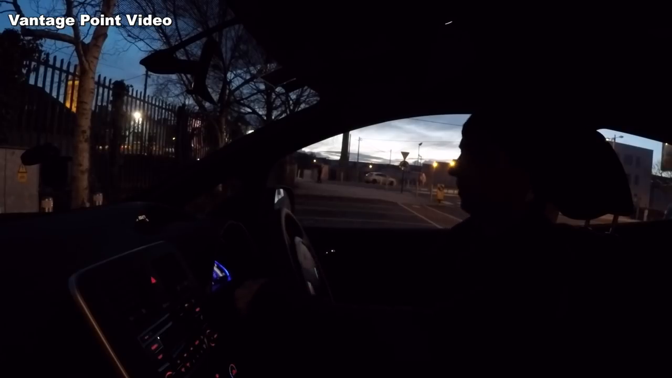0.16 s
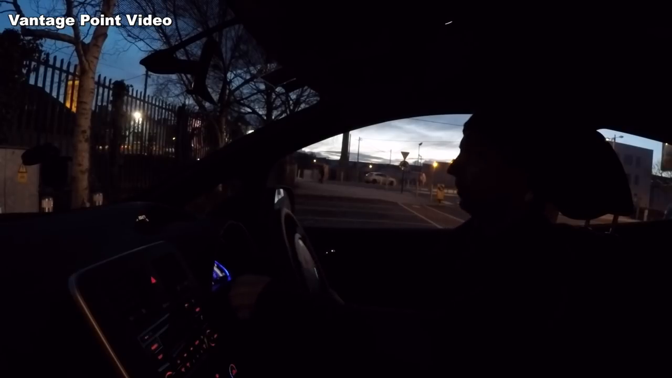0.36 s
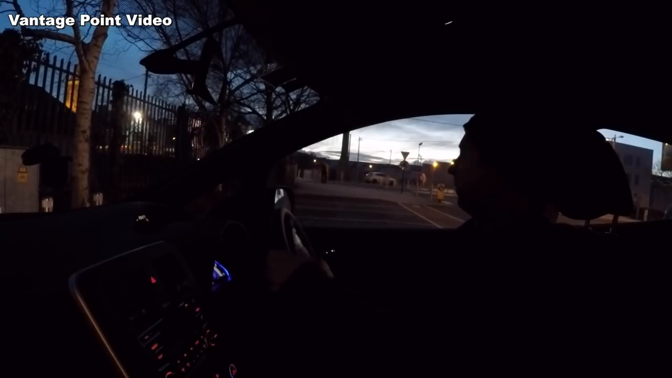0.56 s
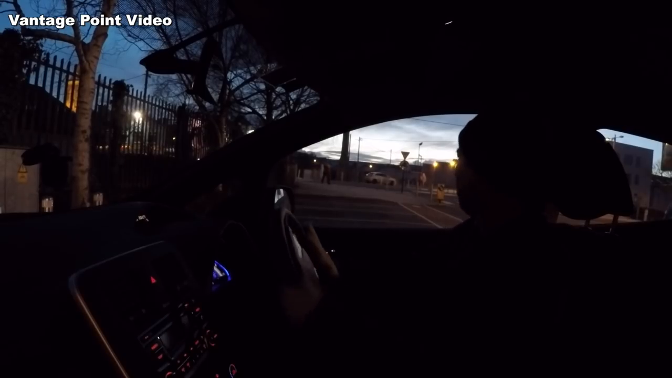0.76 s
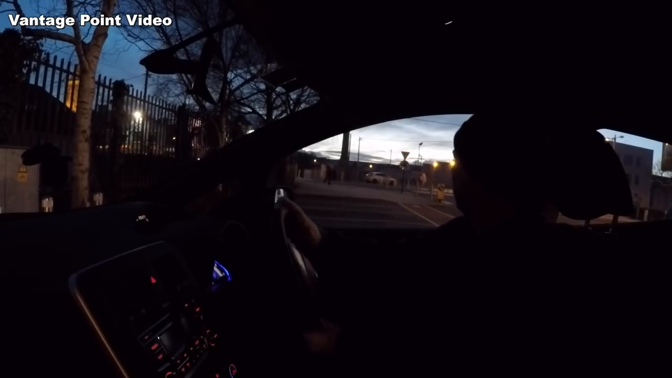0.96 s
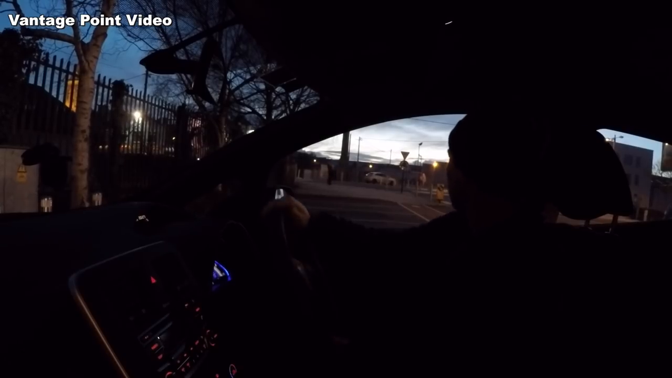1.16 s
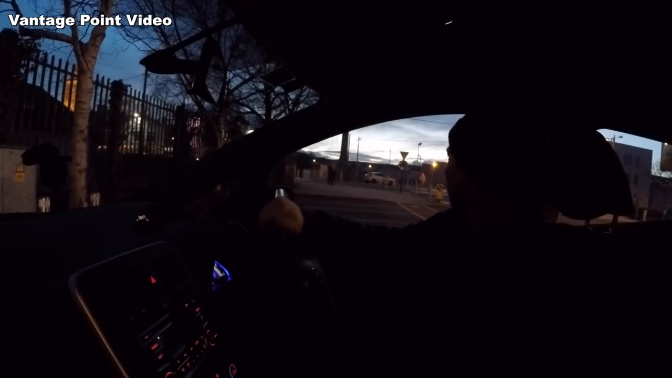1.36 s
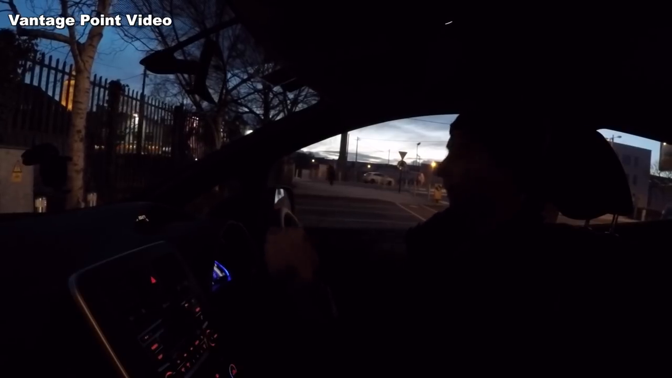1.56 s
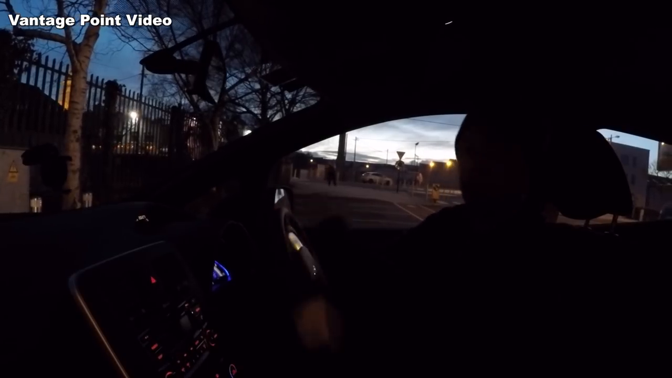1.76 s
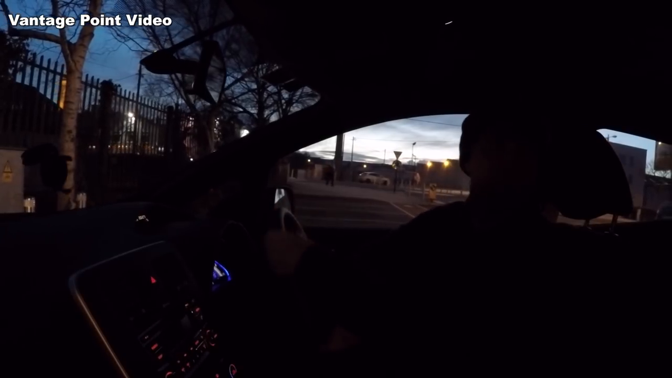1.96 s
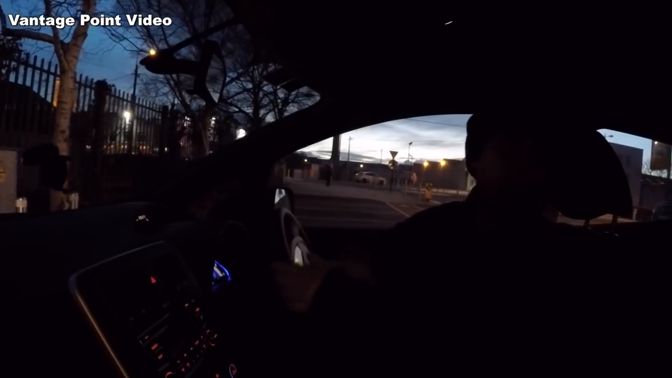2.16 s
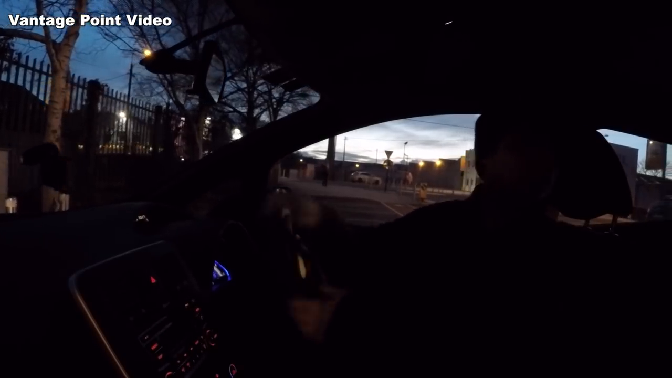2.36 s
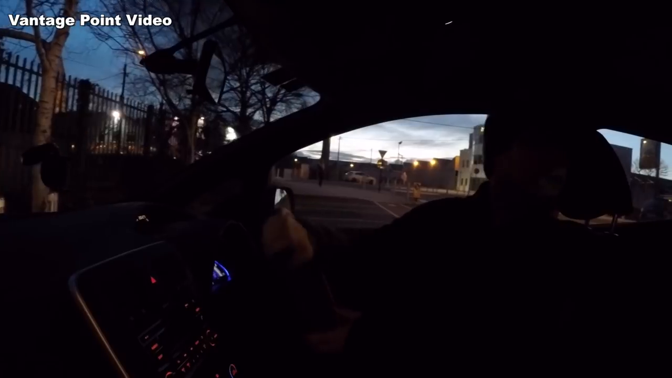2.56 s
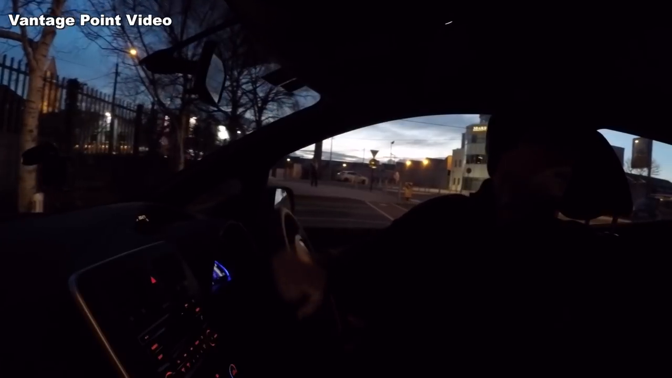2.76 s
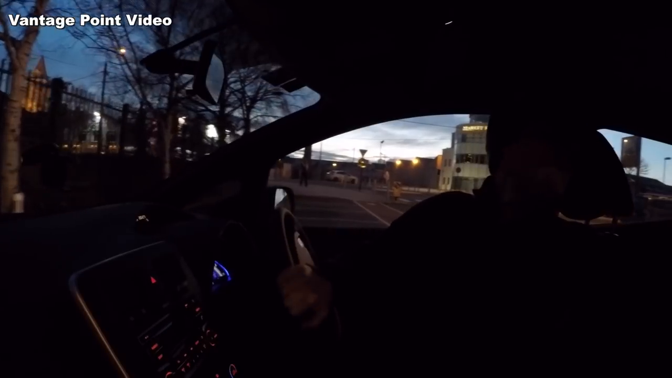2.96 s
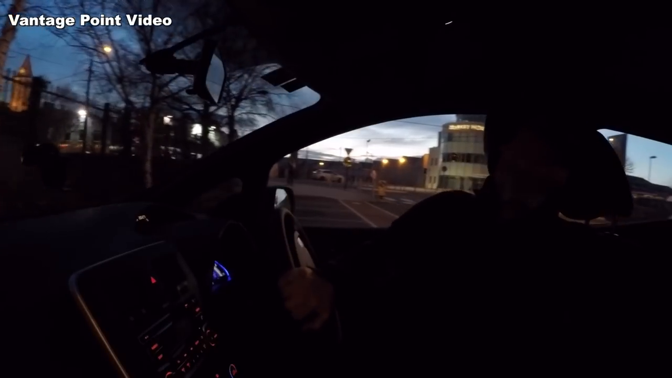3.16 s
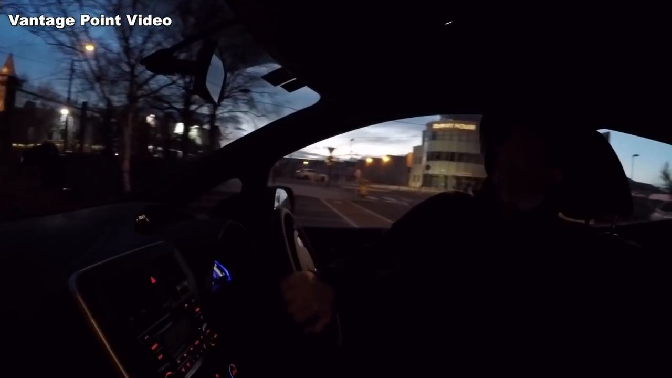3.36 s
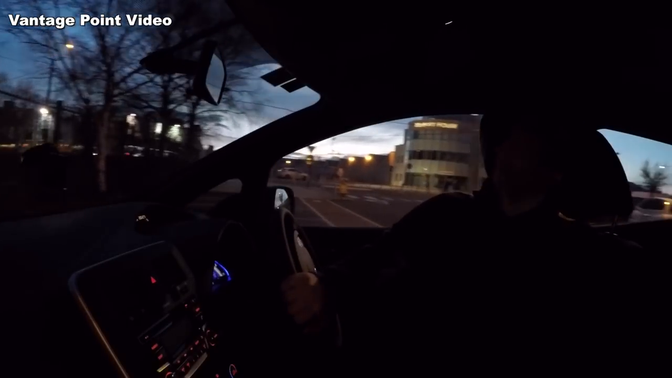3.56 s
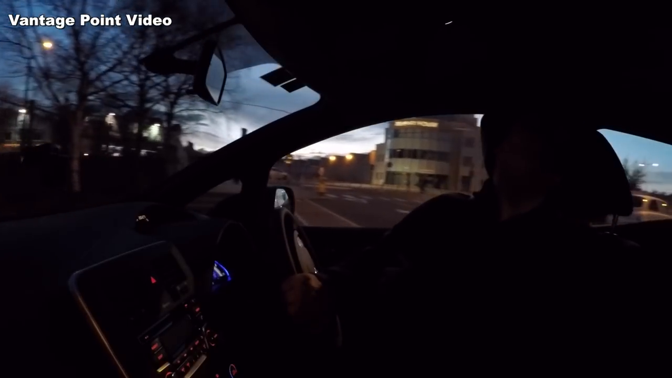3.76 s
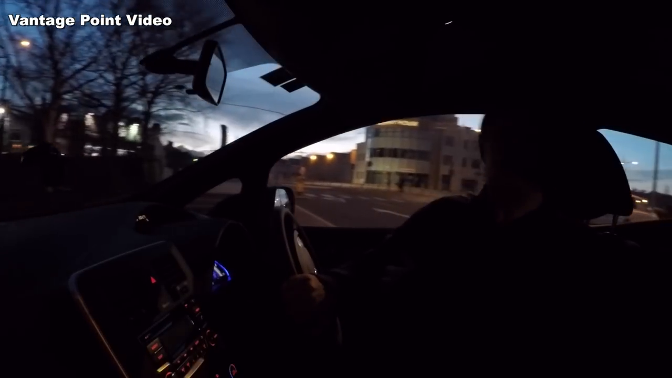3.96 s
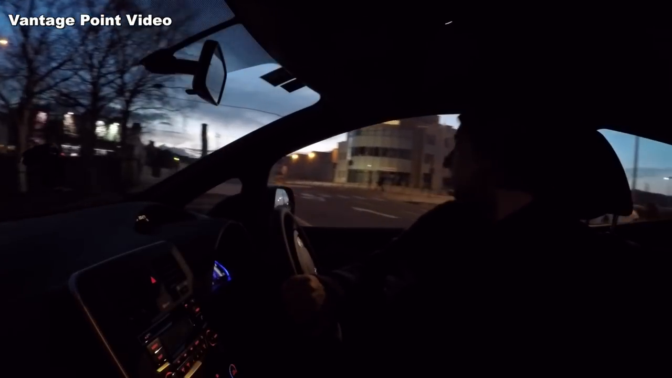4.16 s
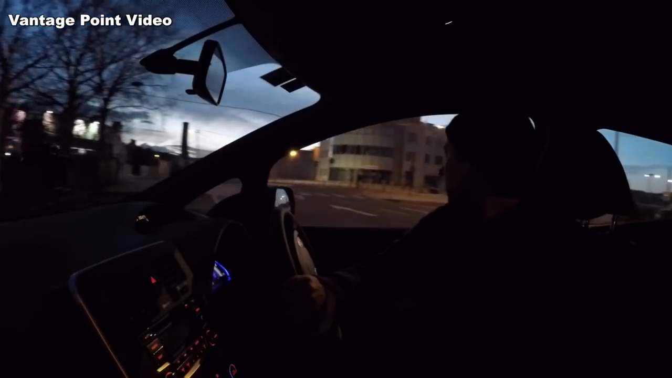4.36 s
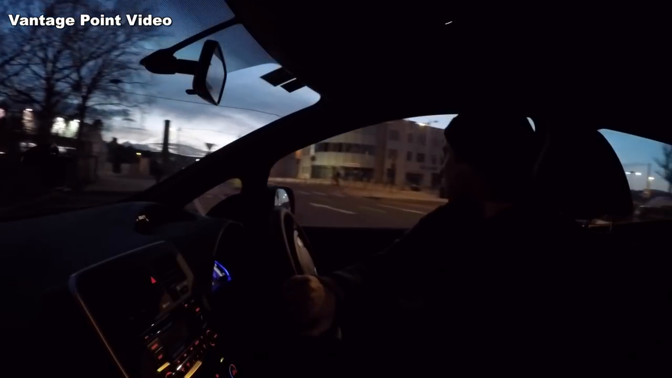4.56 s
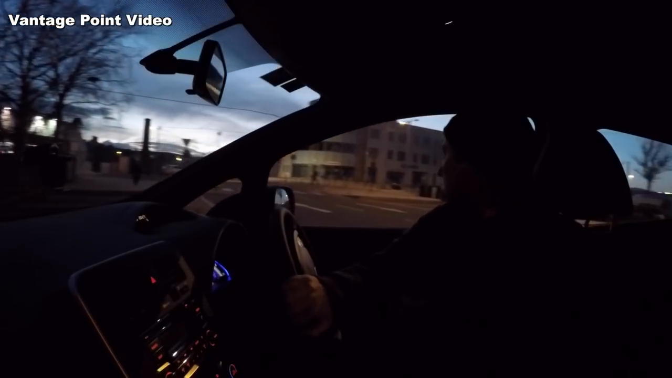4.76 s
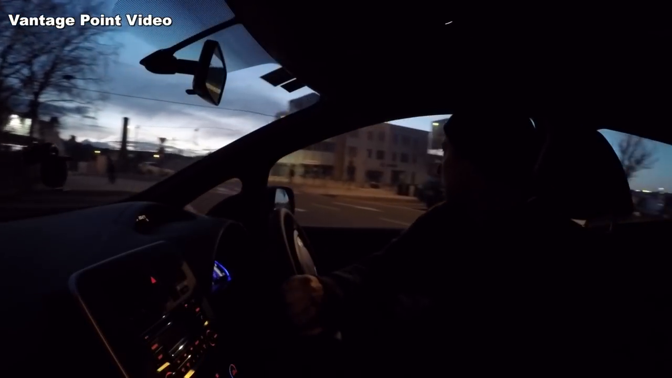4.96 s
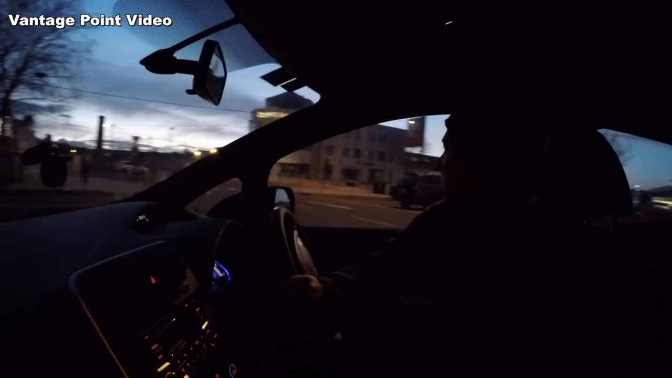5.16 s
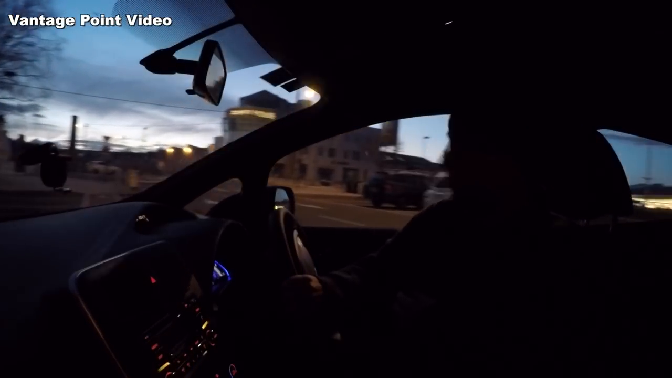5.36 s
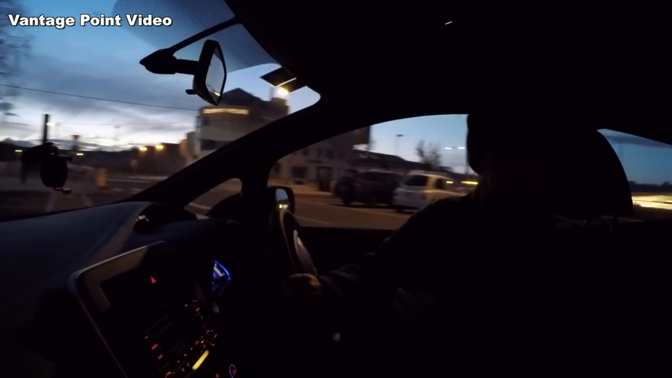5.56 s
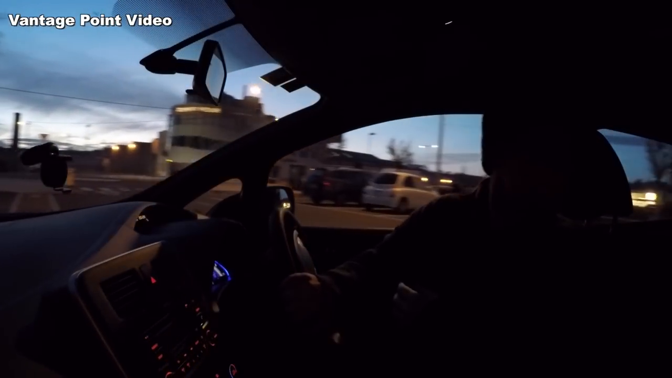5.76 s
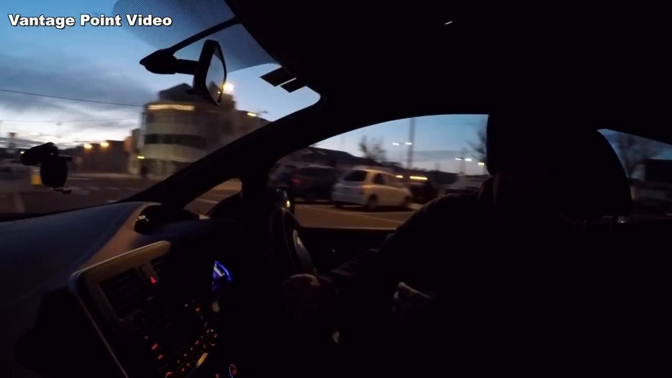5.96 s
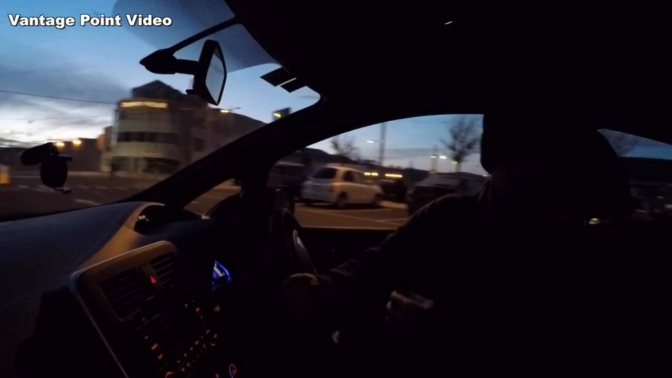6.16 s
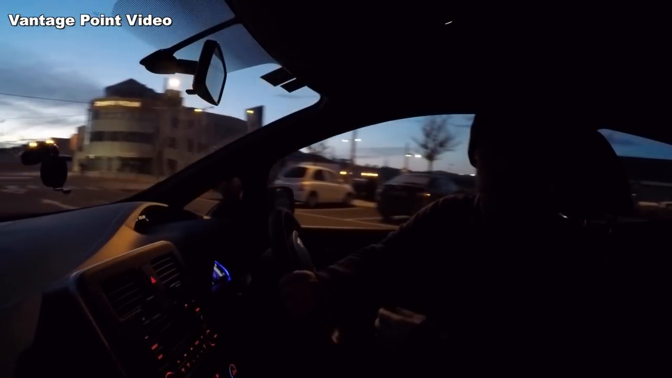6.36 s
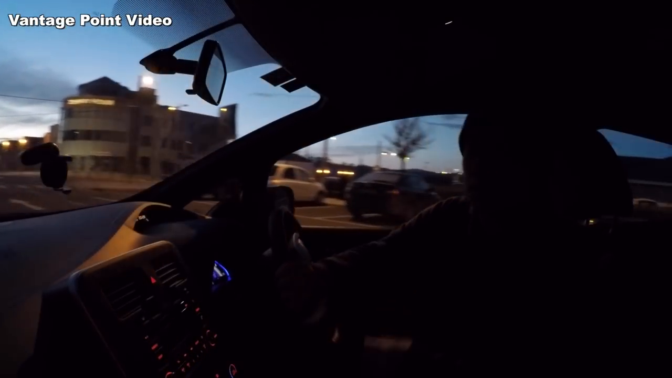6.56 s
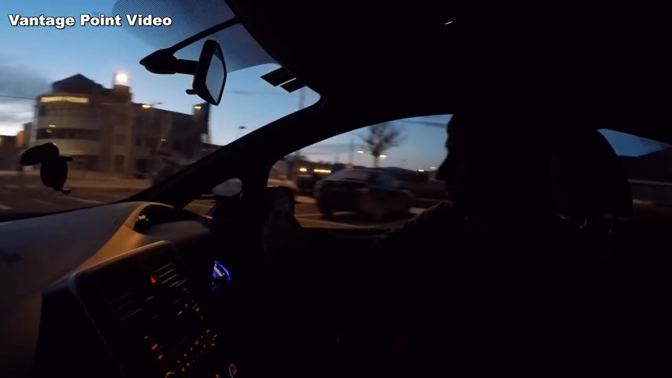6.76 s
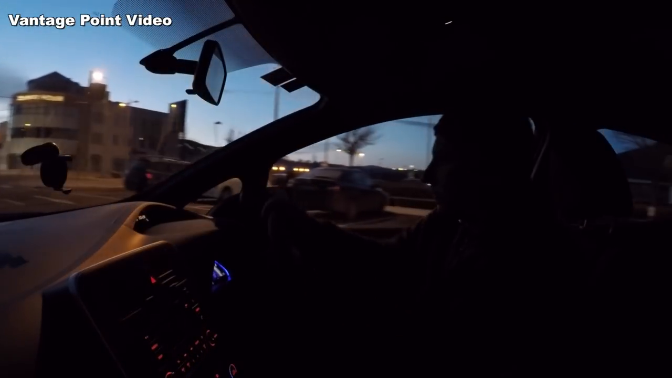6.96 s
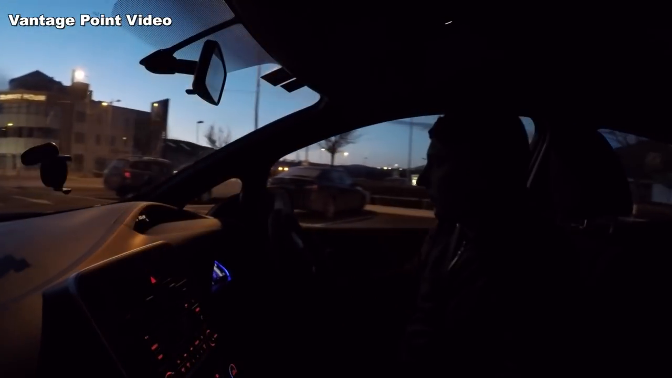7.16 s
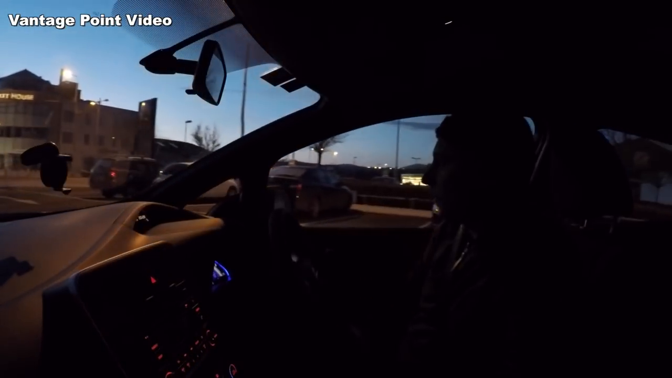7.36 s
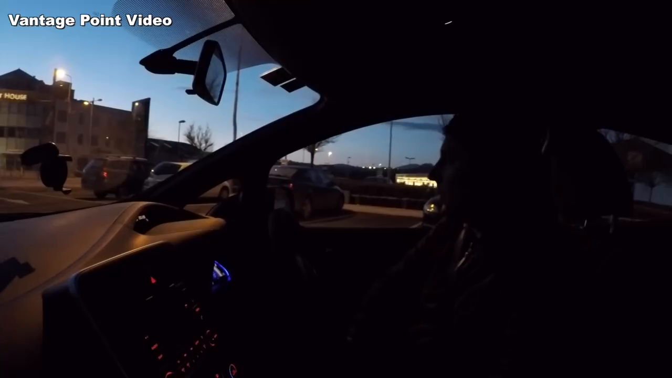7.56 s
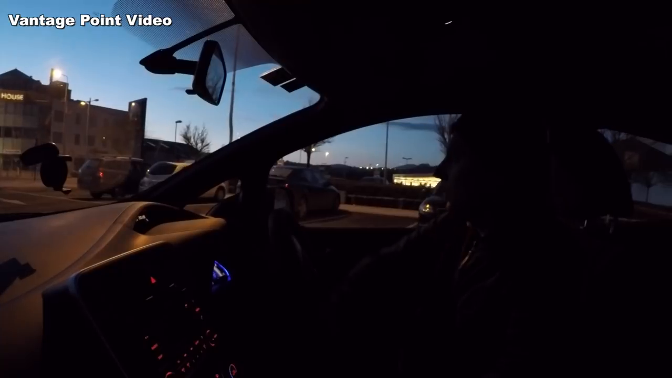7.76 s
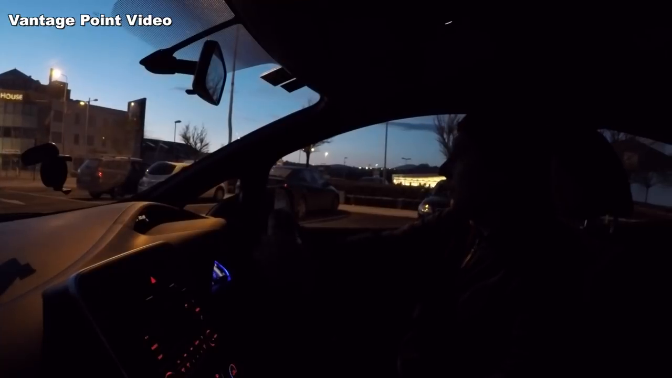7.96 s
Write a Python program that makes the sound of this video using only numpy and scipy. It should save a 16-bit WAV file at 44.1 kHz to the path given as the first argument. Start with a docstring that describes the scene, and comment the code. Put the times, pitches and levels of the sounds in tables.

```python
"""Inside an electric car that pulls out of a side street at walking pace, turns, gathers speed and slows again.
At first sleeves rub as filtered fibre contacts, the wheel rubs in bumps and settles into a harmonic groan. As
speed grows, coloured noise booms, rumbles and roars; gear sines whine faintly until just before the top speed.
Throughout, blows ring damped body modes and short noise bursts tick in the trim, over a steady noise hiss. Late
on, a low tone swells over a dip, something loose clacks, and the steering wheel rubs again."""
import sys
import numpy as np
from scipy import signal
from scipy.fft import rfft, irfft
from scipy.io import wavfile
from scipy.ndimage import uniform_filter1d

SR = 44100
rng = np.random.default_rng(int(sys.argv[2]) if len(sys.argv) > 2 else 0)


def bounce(signal):
    """Save signal as a 16-bit WAV file at the path given by the first command-line argument."""
    frames = np.transpose(np.atleast_2d(signal))
    limited = np.clip(frames, -1, 1)
    pcm = np.round(limited * 32767).astype(np.int16)
    wavfile.write(sys.argv[1], SR, pcm)


N = 353152
TIME = np.arange(N) / SR

# Road speed, given as the pitch of the gear mesh: time_s, pitch_hz
SPEED = [(0, 78.5), (1.0, 73.5), (2.3, 118), (2.96, 263), (3.14, 298.3), (3.47, 404), (3.72, 445),
         (4.05, 452), (4.33, 428), (4.84, 467), (5.19, 554), (5.6, 616.5), (5.82, 597.5), (6.4, 644),
         (6.9, 573), (7.35, 352), (7.7, 170), (8.01, 223)]
# Spectrum of the low rumble of tyres and floor: frequency_hz, relative_density_db
RUMBLE_SPECTRUM = [(40, -7), (66, 3), (82, -1.5), (102, 0), (130, -7), (160, -13.5), (205, -28.5),
                   (245, -25), (310, -45), (500, -56)]


def undb(db):
    """Logarithmic level: decibels to amplitude gain."""
    return 10 ** (np.asarray(db) / 20)


def unit(x):
    """Normalisation: scale to rms 1."""
    return x / np.sqrt(np.mean(x ** 2) + 1e-20)


def curve(rows, column=1, outside=None):
    """Linear interpolation in time of one column of a table."""
    rows = np.array(rows, float)
    return np.interp(TIME, rows[:, 0], rows[:, column], left=outside, right=outside)


def fader(rows, column=1):
    """Amplitude envelope of a source that is silent outside its table."""
    return undb(curve(rows, column, -np.inf))


def colour(x, points):
    """Spectral shaping: filter x through (frequency_hz, level_db) points; rms 1."""
    point_hz, point_db = np.transpose(points)
    hz = np.maximum(np.fft.rfftfreq(len(x), 1 / SR), 1)
    # straight lines on a logarithmic frequency axis
    level_db = np.interp(np.log(hz), np.log(point_hz), point_db, left=-120, right=-120)
    return unit(irfft(rfft(x) * undb(level_db), len(x)))


def walk(rate):
    """Random modulation: a smooth wander, with about rate new values per second; rms 1."""
    step = max(int(SR / rate), 2)
    stairs = np.repeat(rng.standard_normal(N // step + 1), step)
    smooth = uniform_filter1d(uniform_filter1d(stairs, step), step)
    return unit(smooth[:N])


def grains(rate, spread_db):
    """Shot noise: tiny contacts at random moments, rate per second on average, uneven in size."""
    contacts = rng.random(N) < rate / SR
    return contacts * rng.standard_normal(N) * undb(spread_db * rng.standard_normal(N))


def steady(x, seconds):
    """Envelope levelling: even out the swells that are slower than the given time; rms 1."""
    power = np.abs(signal.hilbert(x)) ** 2
    slow_power = uniform_filter1d(power, max(int(seconds * SR), 1))
    return unit(x / np.sqrt(slow_power + 1e-9))


def add(out, start, sound):
    """Superposition: mix a short sound in at its moment."""
    i = int(start * SR)
    out[i:i + len(sound)] += sound[:N - i]


def swell(peak, length):
    """Asymmetric Gaussian envelope that falls faster than it builds; height 1."""
    fall_share = 0.35  # share of the length after the peak
    side = np.where(TIME < peak, 1 - fall_share, fall_share)
    return np.exp(-((TIME - peak) / (length * side)) ** 2)


def swells(rows, column=2):
    """Incoherent addition: gain of a row of swells whose powers add."""
    return np.sqrt(sum((undb(row[column]) * swell(row[0], row[1])) ** 2 for row in rows))


def held(start, length, ramp):
    """Trapezoidal envelope of attack, hold and release, at half height at start and end; height 1."""
    inside = np.minimum(TIME - start, start + length - TIME)
    return np.clip(inside / ramp + .5, 0, 1)


def burst(t, rise, decay):
    """Impulsive envelope: quick attack and exponential decay from t = 0; height 1."""
    t = np.clip(t, 0, 1)
    shape = (1 - np.exp(-(t / rise) ** 2)) * np.exp(-t / decay)
    return shape / shape.max()


def tone(hz, waver, rate):
    """Frequency modulation: a sine whose pitch wanders by the given share; rms 1."""
    phase = 2 * np.pi * np.cumsum(hz * (1 + waver * walk(rate))) / SR
    return np.sqrt(2) * np.sin(phase)


def road(patchy_db=0.84, surge_db=1.4):
    """Broadband excitation: long waves rock the body, stones drum the tyres, the tread roars; all grow with speed."""
    # Spectra of the body's boom and of the tread: frequency_hz, relative_density_db
    boom_spectrum = [(15, -21.5), (24, -14.5), (31, -0.5), (39, -1), (50, -4.5), (62, -17), (80, -33.5),
                     (130, -59)]
    roar_spectrum = [(150, -2.5), (245, 6.5), (310, -0.5), (410, -1.5), (500, -4.5), (620, -8.5),
                     (750, -9.5), (900, -19.5), (1200, -17.5), (4000, -33)]
    # Heaves of the body on its springs: peak_s, length_s, level_db
    heaves = [(.07, 0.21, -28), (.55, 0.49, -30.5), (1.43, 0.23, -35.5), (2.05, 0.3, -34),
              (2.65, 0.44, -30), (3.4, 0.44, -28.5), (3.91, 0.12, -22), (4.63, 0.21, -23.5),
              (5.2, 0.093, -16.5), (5.95, .35, -22.5), (6.25, 0.071, -22), (6.62, 0.46, -21)]
    # Coarse patches of road: peak_s, length_s, rumble_level_db, roar_level_db
    patches = [(1.25, 1, -44.5, -60.5), (1.85, 0.7, -44.5, -59), (3.45, 0.61, -50, -62),
               (4.17, 0.14, -52, -63), (6.25, 1, -36, -63), (6.72, 0.21, -36.5, -54), (7.05, 1, -42, -54.5)]
    cruise_hz = 600  # mesh pitch at cruising speed
    # levels at cruising speed, and the power of speed by which each amplitude grows
    boom_db, boom_power = -25, 1.04
    rumble_db, rumble_power, crawl_rumble_db = -39, 1.63, -50.5
    roar_db, roar_power = -60, 0.11

    speed = curve(SPEED) / cruise_hz
    rocking = np.hypot(undb(boom_db) * speed ** boom_power, swells(heaves))
    rolling = np.hypot(undb(rumble_db) * speed ** rumble_power, undb(crawl_rumble_db))
    drumming = np.hypot(rolling, swells(patches))
    roaring = np.hypot(undb(roar_db) * speed ** roar_power, swells(patches, column=-1))

    boom = steady(colour(rng.standard_normal(N), boom_spectrum), 0.15) * rocking
    rumble = steady(colour(grains(900, 1.9), RUMBLE_SPECTRUM), 0.23) * drumming
    roar = colour(grains(3000, 2.84), roar_spectrum) * undb(patchy_db * walk(18)) * roaring
    load = undb(surge_db * walk(8.2))  # the weight on the wheels comes and goes
    return boom + load * (rumble + roar)


def jolts(length_s=0.09):
    """Transient forcing: wheels drop into shallow hollows; each sends a short, dull surge through the floor."""
    # Shallow hollows: peak_s, level_db
    hollows = [(3.34, -38), (3.65, -35), (4.29, -36.5), (4.46, -38), (4.86, -36), (5.41, -33),
               (5.73, -32.5), (6.12, -32.5), (6.5, -28.5)]
    surges = swells([(peak, length_s, db) for peak, db in hollows])
    return steady(colour(rng.standard_normal(N), RUMBLE_SPECTRUM), 0.06) * surges


def blow(hz, corner_hz, lightness=0.16, slope=2.84):
    """Force spectrum of an impact: a soft blow misses the highs, a sharp one the lowest bass."""
    highs = 1 / np.hypot(1, (hz / corner_hz) ** slope)
    bass = 1 / np.hypot(1, lightness * corner_hz / hz)
    return highs * bass


def knocks(clatter=0.53, thud_db=-4, thud_s=0.017, rise=0.0023):
    """Modal synthesis: a blow and its clatter ring the body, while damped panels answer with a dull thud."""
    # Knocks through the suspension: start_s, level_db, corner_hz of the blow, clatter_decay_s
    strikes = [(0.156, -43, 400, 0.003), (1.642, -32, 465, 0.019), (1.688, -23.5, 210, 0.053),
               (1.757, -33, 71, 0.041), (1.934, -33, 222, 0.038), (2.521, -29, 30, 0.037),
               (2.797, -47, 903, 0.012), (2.936, -38.5, 560, 0.0098), (2.954, -28.5, 62, 0.027),
               (3.621, -47, 259, 0.017), (6.470, -26, 320, 0.0098), (7.41, -42.5, 260, .012),
               (7.815, -36.5, 338, 0.01)]
    # Mean modes of body and cabin: frequency_hz, level_db, t60_s
    modes = [(67, -2, 0.27), (103.1, -3.5, 0.25), (133, 4, 0.17), (173.4, -5, 0.25), (230.4, -8, 0.15),
             (244, -5, 0.12), (345, -13, 0.077), (376, -5, 0.061), (422, -13, 0.13), (660, -9, 0.065),
             (750, -10, 0.059)]
    # Spectrum of the many damped panels: frequency_hz, relative_density_db
    panels = [(70, -8), (140, -0.5), (300, -15), (750, -21.5), (1400, -40)]

    def sized(x):
        """Normalisation: standard deviation 1 over the first 40 ms."""
        return x / np.std(x[:SR // 25])

    out, t = np.zeros(N), TIME[:SR // 2]
    mounts = 1 - np.exp(-(t / rise) ** 2)  # rubber mounts round the attack
    for start, db, corner_hz, length in strikes:
        ring = 0
        for hz, mode_db, t60 in modes:
            detuned_hz = hz * (1 + 0.025 * rng.standard_normal())
            phase = rng.uniform(0, 2 * np.pi)
            gain = undb(mode_db) * blow(hz, corner_hz)
            decay = np.exp(-np.log(1000) * t / t60)
            ring = ring + gain * np.sin(2 * np.pi * detuned_hz * t + phase) * decay
        push = rng.standard_normal(len(t)) * np.exp(-t / length)
        push *= clatter / np.linalg.norm(push)
        push[0] += 1  # the blow itself, ahead of the clatter
        ring = signal.fftconvolve(ring * mounts, push)[:len(t)]
        struck = [(hz, panel_db + 20 * np.log10(blow(hz, corner_hz))) for hz, panel_db in panels]
        thud = colour(rng.standard_normal(len(t)), struck) * mounts * np.exp(-t / thud_s)
        mix = sized(ring) + undb(thud_db) * sized(thud)
        add(out, start, undb(db) * sized(mix))
    return out


def cabin(hz, cutoff_hz=520):
    """Resonance: a gear tone is lifted near the cabin's modes and muffled above the cut-off."""
    # Cabin resonances that the gear tones sweep through: frequency_hz, width_hz, lift_db
    resonances = [(282.2, 20, 21), (302, 19, 9.5), (425, 110, 3.5)]
    lift = sum(undb(db) / (1 + (2 * (hz - centre) / width) ** 2) for centre, width, db in resonances)
    return np.hypot(1, lift) / np.hypot(1, (hz / cutoff_hz) ** 8)


def drive(waver=0.00814, flutter_db=3.5, panel_ramp=0.077):
    """Gear-mesh tones follow speed and torque through cabin resonances; one panel hums at its own pitches."""
    # Torque of the drive, with which its tones come and go: time_s, gain_db
    torque = [(2.93, -3), (3.06, 6), (3.17, -8), (3.38, -1), (4.5, -1), (5.68, -4), (5.85, 3), (6.3, -4.5)]
    # Hums of a panel: start_s, length_s, gain_db
    panel_hums = [(4.888, 0.14, -60), (5.059, 0.43, -68.5), (5.79, 0.12, -57)]
    # Pitches of that panel: pitch_hz, relative_level_db
    panel_tones = [(300, -5), (399, -1), (500, -11.5)]
    mesh_db, half_mesh_db = -71.5, -76.5  # before cabin, torque and flutter

    mesh_hz = curve(SPEED)
    half_hz = mesh_hz / 2  # an octave below
    gears = undb(mesh_db) * cabin(mesh_hz) * tone(mesh_hz, waver, 40)
    gears = gears + undb(half_mesh_db) * cabin(half_hz) * tone(half_hz, waver, 40)
    hum = sum(undb(db) * tone(hz, waver, 40) for hz, db in panel_tones)
    humming = sum(undb(db) * held(start, length, panel_ramp) for start, length, db in panel_hums)
    flutter = undb(flutter_db * walk(18))
    return (gears * fader(torque) + hum * humming) * flutter


def dip(waver=0.065, ramp=0.028):
    """Modal excitation: the suspension sinks over a dip and a low mode of the cabin swells briefly."""
    start_s, length_s, level_db, pitch_hz = 6.965, 0.084, -28, 104.3
    return tone(pitch_hz, waver, 70) * undb(level_db) * held(start_s, length_s, ramp)


def steering(second_db=-25, third_db=-35):
    """Stick-slip friction: low rubbing as the wheel is wound round settles into a short groan of rubber."""
    # Turns of the steering wheel at a crawl: peak_s, length_s, level_db
    turns = [(.2, 0.14, -54), (.42, 0.19, -47), (.63, 0.27, -43), (.89, 0.11, -46.5), (1.17, 0.22, -54.5),
             (7.43, 0.14, -50), (7.68, 0.13, -50), (7.95, 0.67, -53)]
    # Spectrum of the rubbing: frequency_hz, relative_density_db
    rub_spectrum = [(90, -14), (135, -4.5), (175, 9.5), (210, -12), (250, -1), (330, -19), (650, -42),
                    (900, -38)]
    # Rubber groaning under the turn: time_s, slip_rate_hz, level_db
    groaning = [(1.27, 67.6, -61), (1.39, 77.3, -29.5), (1.435, 82.8, -39.5), (1.495, 91.5, -27),
                (1.56, 89, -46)]

    rub = steady(colour(grains(1200, 1.5), rub_spectrum), 0.043) * swells(turns)
    slip_hz = curve(groaning) * (1 + 0.032 * walk(59.8))
    phase = 2 * np.pi * np.cumsum(slip_hz) / SR
    overtones = undb(second_db) * np.sin(2 * phase) + undb(third_db) * np.sin(3 * phase)
    groan = np.sin(phase) + overtones
    return rub + unit(groan) * fader(groaning, column=-1)


def slips(slip_s=0.026, slip_ramp=0.023):
    """Stick-slip friction: the rubbing wheel grips and lets go in a run of soft, hollow bumps."""
    # Single slips during the turns: start_s, level_db
    bumps = [(0.241, -54.5), (0.298, -54.5), (0.344, -54.5), (0.445, -55), (0.528, -54.5), (0.58, -52.5),
             (0.637, -53), (0.801, -56), (0.857, -53.5)]
    # Spectrum of a slip: frequency_hz, relative_density_db
    slip_spectrum = [(150, -13), (260, 3.5), (360, -0.5), (440, -9.5), (525, -1), (630, -11), (950, -29)]
    gate = sum(undb(db) * held(start + slip_ramp / 2, slip_s, slip_ramp) for start, db in bumps)
    return steady(colour(grains(1500, 1.9), slip_spectrum), 0.02) * gate


def sleeves(flicker_db=1.0):
    """Friction noise: fibres catch and slip as the arms turn the wheel; a fast stroke sounds brighter."""
    # Strokes of the sleeves: peak_s, length_s, level_db, brightness (0 to 1)
    strokes = [(0.697, 0.088, -65, 0.6), (1.098, 0.4, -67.5, 0.54), (1.37, 0.33, -65, 0.36),
               (1.45, 0.074, -55.5, 0.3), (1.977, 0.65, -64.5, 0.08), (2.523, 0.29, -63, 0.27),
               (2.96, 0.76, -63.5, 0.01), (4.246, 0.64, -68.5, 0.02), (6.697, 0.71, -69.5, 0.36),
               (7.05, 0.16, -62, .3), (7.23, 0.28, -60, 0.68), (7.79, 0.71, -67.5, 0), (8, 0.078, -59, .15)]
    # Spectrum of the cloth: frequency_hz, relative_density_db
    cloth_spectrum = [(500, -11), (1000, 0.5), (1500, 2), (2600, -2), (4500, -2.5), (6500, -6.5),
                      (9000, -11.5), (13000, -15.5), (15500, -18)]

    slow = colour(grains(9000, 2.8), cloth_spectrum)
    # differentiation tilts the spectrum towards the treble
    fast = unit(np.diff(colour(grains(5600, 1.2), cloth_spectrum), prepend=0))
    power = np.array([(undb(db) * swell(peak, length)) ** 2 for peak, length, db, _ in strokes])
    bright = np.array(strokes)[:, -1]
    rubbing = slow * np.sqrt((1 - bright) @ power) + fast * np.sqrt(bright @ power)
    return rubbing * undb(flicker_db * walk(35))


def ticks(rise=0.0042):
    """Impulsive contact: a brief crackle of plastic in a broad resonance, which rings the trim."""
    # Ticks of trim and wheel: start_s, level_db, centre_hz, width_octaves, decay_s
    contacts = [(0.146, -45.5, 3000, 1.2, 0.0026), (0.153, -46, 557, 1, 0.0042),
                (1.933, -58, 6000, 1.8, 0.03), (2.250, -57.5, 5670, 0.76, 0.011),
                (2.502, -40.5, 5540, 3.4, 0.0048), (2.511, -54, 414, 0.35, 0.0094),
                (2.553, -57, 5500, 1, 0.0072), (3.311, -59, 1795, 0.91, .007),
                (3.331, -59.5, 4520, 0.85, .004), (3.360, -56.5, 1890, 0.83, .005),
                (3.614, -58.5, 2170, 0.85, 0.0043), (4.157, -57, 3630, 0.27, 0.0069),
                (6.469, -60, 1800, 0.38, 0.0073), (7.051, -50, 4000, 1.6, 0.0034),
                (7.601, -58, 3670, .15, 0.016), (7.606, -56.5, 4200, 1.2, 0.0091)]
    # Modes of the plastic trim: frequency_hz, width_hz, lift_db
    trim_modes = [(4540, 180, -0.5), (5940, 290, 0.5)]

    out, t = np.zeros(N), TIME[:SR // 4]
    f = np.maximum(np.fft.rfftfreq(len(t), 1 / SR), 1)
    ringing = 1 + sum(undb(db) / (1 + 2j * (f - hz) / width) for hz, width, db in trim_modes)
    for start, db, hz, octaves, decay in contacts:
        gain = np.abs(ringing) * np.exp(-.5 * (np.log2(f / hz) / octaves) ** 2)
        crackle = unit(irfft(rfft(rng.standard_normal(len(t))) * gain, len(t)))
        add(out, start, undb(db) * crackle * burst(t, rise, decay))
    return out


def clacks(rise=0.0043, decay=0.0055):
    """Repeated impact: something loose knocks dully against the trim and bounces."""
    # Clacks of something loose: start_s, level_db
    bounces = [(7.387, -46), (7.437, -51), (7.459, -53.5)]
    # Spectrum of a clack: frequency_hz, relative_density_db
    clack_spectrum = [(250, 0), (520, -1), (720, 6), (1000, -5), (1300, -1), (1800, -9), (2550, -9.5),
                      (3100, -28)]
    gate = sum(undb(db) * burst(TIME - start, rise, decay) for start, db in bounces)
    return colour(rng.standard_normal(N), clack_spectrum) * gate


def hiss(hiss_db=-67):
    """Stationary random noise: the soft, even hiss of the cabin."""
    # Spectrum of the hiss: frequency_hz, relative_density_db
    hiss_spectrum = [(500, -1.5), (1200, -2), (2300, -3.5), (4600, -5), (7700, -10), (12000, -13),
                     (15300, -27)]
    return colour(rng.standard_normal(N), hiss_spectrum) * undb(hiss_db)


def scene():
    """Superposition: everything as it meets at the dashboard, in one channel."""
    ride = road() + jolts() + knocks() + drive() + dip()
    hands = steering() + slips() + sleeves()
    interior = ticks() + clacks() + hiss()
    return (ride + hands + interior)[None]


def record(dry):
    """Band limiting: a steep elliptic low-pass removes the top of the treble."""
    top_hz = 15200
    lowpass = signal.ellip(10, .2, 80, top_hz, fs=SR, output="sos")  # ripple .2 dB, stopband 80 dB down
    return signal.sosfilt(lowpass, dry)


dry = scene()
out = record(dry)
bounce(out)
```